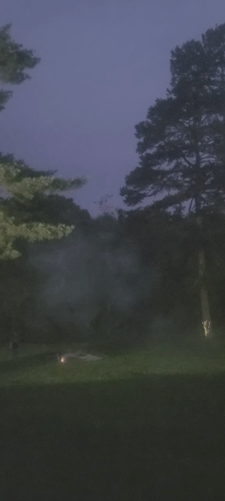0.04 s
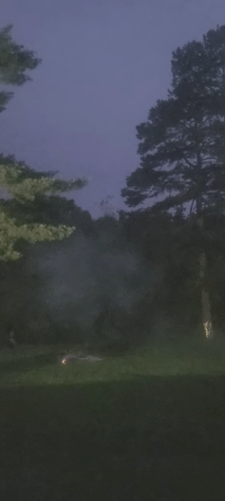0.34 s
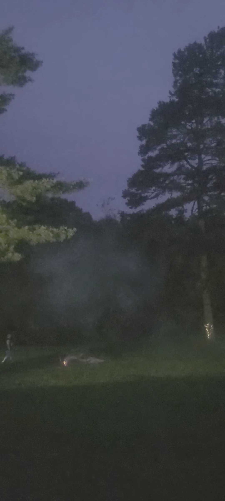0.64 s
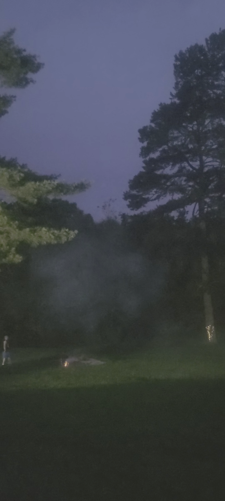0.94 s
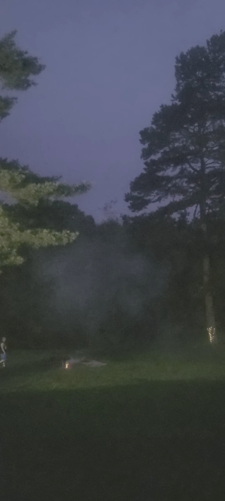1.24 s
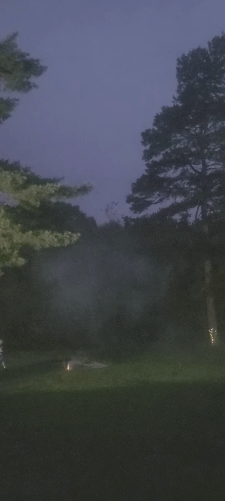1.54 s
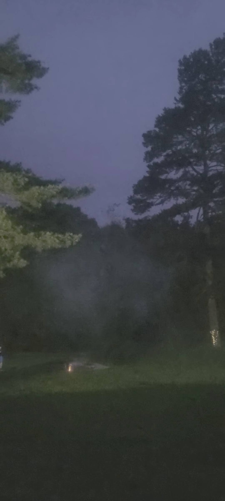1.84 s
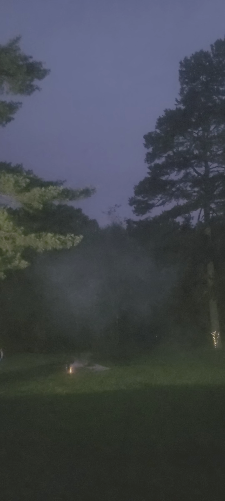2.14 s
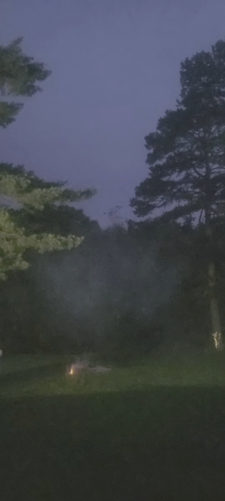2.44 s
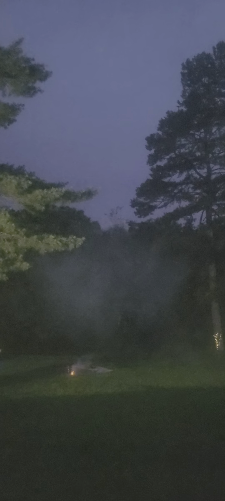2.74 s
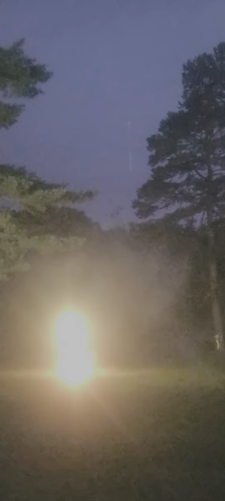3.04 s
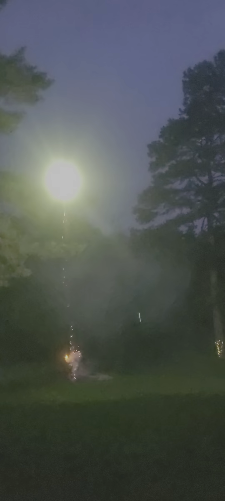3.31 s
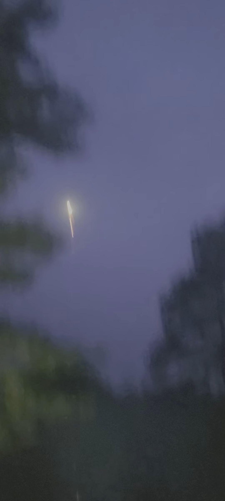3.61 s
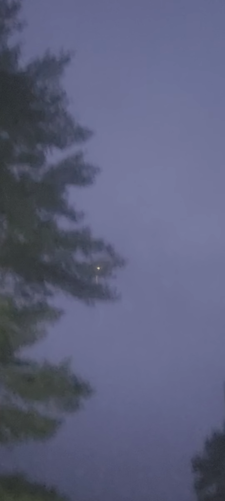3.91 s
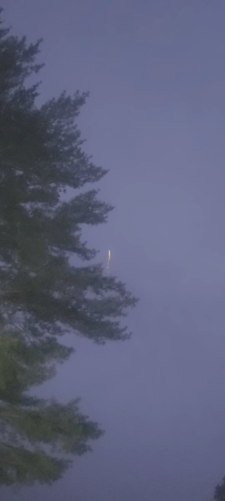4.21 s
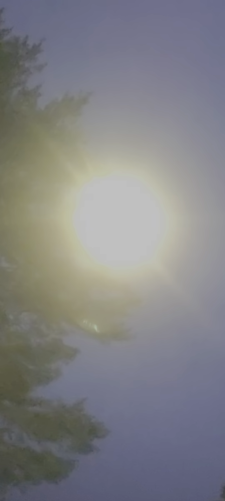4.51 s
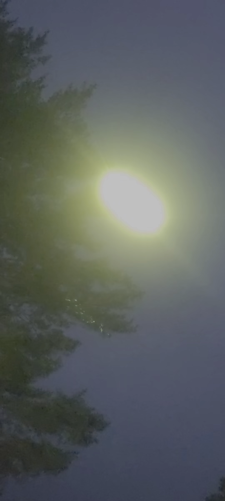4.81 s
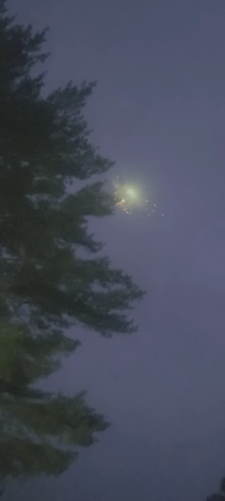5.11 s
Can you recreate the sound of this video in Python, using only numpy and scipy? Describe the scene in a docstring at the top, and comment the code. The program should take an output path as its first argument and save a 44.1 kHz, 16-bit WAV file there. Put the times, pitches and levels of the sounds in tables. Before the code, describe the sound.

A quiet garden at dusk: crickets trill steadily throughout, a katydid rasps in short phrases of three or four strokes, and a distant machine hums faintly over a low outdoor rumble. A few soft, brief rustles occur close to the microphone. At about 3.2 seconds a firework goes off on the lawn with a single sharp bang, by far the loudest sound. Its crack and short boom bounce off nearby surfaces and scatter through the trees as a hissing tail that fades over about a second. At around 4.6 seconds comes a smaller dry pop, then near 4.8 seconds a quick cluster of crackling pops and knocks with a low thump and a light echo. A faint, grainy fizz of sparks dies away, and one last tiny pop sounds at about 5.2 seconds as the insects continue.

```python
"""A firework bangs once on a lawn at dusk: a shock front and its boom, reflected by the ground and nearby
walls and scattered by the tree line. Small dry pops and knocks with a low thump follow; sparks fizz out.
All along, crickets trill as wing strokes pulse their resonances, a katydid rasps its file in short
phrases, a distant machine hums and something rustles softly near the microphone."""
import sys
import numpy as np
from scipy import signal
from scipy.fft import rfft, irfft, next_fast_len
from scipy.io import wavfile
from scipy.ndimage import map_coordinates

SR = 44100
rng = np.random.default_rng(int(sys.argv[2]) if len(sys.argv) > 2 else 0)


def master(y):
    """Save y as 16-bit WAV."""
    cut = np.clip(np.atleast_2d(y).T, -1, 1)
    pcm = np.round(cut * 32767)  # scale
    wavfile.write(sys.argv[1], SR, pcm.astype(np.int16))


N = 231745
TIME = np.arange(N) / SR


def amp(db):
    """Decibels to amplitude ratio."""
    return 10 ** (np.asarray(db) / 20)


def unit(x):
    """Normalisation to rms 1."""
    return x / np.sqrt(np.mean(x ** 2) + 1e-20)


def along(points, hz):
    """Interpolation of (Hz, value) points on a logarithmic frequency axis."""
    knots, values = np.transpose(points)
    return np.interp(np.log(hz + 1), np.log(knots + 1), values)


def pan(db):
    """Level difference: two gains, the left db above the right."""
    return amp(np.array([[.5], [-.5]]) * db)


def wobble(rate):
    """Random modulation: a smooth curve with rate knots a second."""
    return map_coordinates(rng.standard_normal(int(N * rate / SR) + 4), [TIME * rate])


def dying(s, t60):
    """Exponential decay from time s, losing 60 dB in t60 seconds."""
    return amp(-60 * np.maximum(TIME - s, 0) / t60) * (TIME > s)


def ring(s, hz, t60):
    """Damped oscillation from time s."""
    return np.sin(2 * np.pi * hz * (TIME - s)) * dying(s, t60)


def filtered(x, response):
    """Linear filtering: the spectrum of x times a frequency response."""
    size = next_fast_len(N + SR // 2)
    return irfft(rfft(x, size) * response(np.fft.rfftfreq(size, 1 / SR)), size)[..., :N]


def later(x, s):
    """A delay of s seconds as a linear phase shift."""
    return filtered(x, lambda hz: np.exp(-2j * np.pi * hz * s))


def narrow(centre, width):
    """Resonance driven by stereo noise; its amplitude halves width Hz from the centre."""
    noise = rng.standard_normal((2, N))
    return unit(filtered(noise, lambda hz: 1 / (1 + ((hz - centre) / width) ** 2)))


def struck(x, colour, size=4096):
    """Minimum-phase filtering: the colour rings only after each pulse."""
    gain = amp(along(colour, np.fft.rfftfreq(size, 1 / SR)))
    cepstrum = irfft(np.log(gain))
    cepstrum[1:size // 2] *= 2
    cepstrum[size // 2 + 1:] = 0
    impulse_response = irfft(np.exp(rfft(cepstrum)))
    return signal.fftconvolve(x, impulse_response[None], axes=1)[:, :N]


# Likeness of left and right. Each row: frequency in Hz, correlation.
COHERENCE = [(60, 0.98), (180, 0.93), (550, 0.81), (1650, 0.38), (4970, 0.0081), (15000, 0.07)]
def diffuse(colour, grain_db=0):
    """A diffuse field of rms 1: noise from all around, coherent in the bass, unrelated in the treble."""
    white = rng.standard_normal((2, N)) * amp(grain_db * wobble(900))
    angle = lambda hz: np.arccos(np.clip(along(COHERENCE, hz), -1, 1)) / 2
    mid, side = filtered(white, lambda hz: amp(along(colour, hz)) * [np.cos(angle(hz)), np.sin(angle(hz))])
    return unit(np.array([mid + side, mid - side]))


# Spectra of the outdoor rumble and of far insects. Each row: frequency in Hz, relative level in dB.
AIR_SPECTRUM = [(15, -42.5), (25, -43), (37, -13.5), (59, 3), (124, -8.5), (145, -14.5), (267, -21),
                (299, -14.5), (384, -18.5), (414, -11.5), (447, -20.5), (763, -17.5), (1040, -21.5),
                (2400, -23.5), (3120, -59), (5280, -120)]
HAZE_SPECTRUM = [(1800, -24), (2500, -15), (3200, 12), (3900, -22), (4400, -4), (4800, 5.5), (5900, 6.5),
                 (6700, -6.5), (7800, -15.5), (8800, -36.5), (12000, -24.5), (15000, -17.5)]
# The distant machine's hum. Each row: frequency in Hz, relative level in dB.
HUM_PARTIALS = [(59.5, -66.5), (120, -66.5), (301, -71), (360, -75), (420, -78.5), (478, -76)]
# Its fan's resonances. Each row: centre in Hz, half-width in Hz, relative level in dB.
FAN_RESONANCES = [(773, 30, -71), (1308, 67, -74), (1714, 55, -75.5), (1964, 40, -74.5)]
# The background's balance. Each row: frequency in Hz, left over right in dB.
BACKGROUND_BALANCE = [(60, 10), (110, 12), (200, 10.5), (380, 9.5), (700, 7), (1290, 4), (2380, -3.5),
                      (4400, 4.5), (8120, 14.5), (15000, 8)]
def evening(left_lead_s=.00009):
    """Superposition of outdoor rumble, a machine and far insects, reaching the left microphone first."""
    air = amp(-57 + .89 * wobble(2.67)) * diffuse(AIR_SPECTRUM)
    wavering = lambda hz: amp(1.8 * wobble(5)) * np.sin(2 * np.pi * hz * TIME + .8 * wobble(6))
    hum = sum(amp(db) * wavering(hz) for hz, db in HUM_PARTIALS)
    fan = sum(amp(db) * narrow(centre, width) for centre, width, db in FAN_RESONANCES)
    haze = amp(-67.5 + .3 * wobble(5.3)) * diffuse(HAZE_SPECTRUM)
    left, right = filtered(air + hum + fan + haze, lambda hz: pan(along(BACKGROUND_BALANCE, hz)))
    return np.array([left, later(right, left_lead_s)])


# Cricket trills. Each row: centre in Hz, half-width in Hz, level in dB, pulses per second,
# pulse depth from 0 to 1, left over right in dB.
CRICKET_TRILLS = [(2905, 89, -62.5, 63, 0.28, 5), (2747, 114, -63, 55, 0, 0), (3608, 82, -77.5, 11, 0, 17),
                  (4120, 170, -84, 49, 0.5, 15.5), (6096, 147, -67.5, 85, 0.25, 1.5)]
def crickets():
    """Amplitude modulation: wing strokes pulse each resonance; many singers and echoes blur the pitch."""
    out = np.zeros((2, N))
    for centre, width, db, rate, depth, left_db in CRICKET_TRILLS:
        cycles = np.cumsum(rate * (1 + .004 * wobble(3))) / SR
        strokes = 1 + depth * np.cos(2 * np.pi * cycles)
        swell = amp(.6 * wobble(4))
        out += amp(db) * swell * unit(narrow(centre, width) * strokes) * pan(left_db)
    return out


# Faint insect notes. Each row: centre in Hz, half-width in Hz, level in dB, chirps per second.
HIGH_CHIRPS = [(9840, 81, -102.5, 5.6), (9440, 50, -105, 2.7)]
def chirpers():
    """Gated resonances: thin, very high insect notes come and go."""
    gate = lambda rate: np.maximum(np.sin(2 * np.pi * rate * TIME + .5 * wobble(2.1)), 0)
    notes = sum(amp(db) * unit(narrow(hz, width) * gate(rate)) for hz, width, db, rate in HIGH_CHIRPS)
    return notes * pan(db=9)


# Katydid phrases. Each row: start in seconds, number of rasps, level in dB.
KATYDID_PHRASES = [(.02, 3, -74), (0.449, 4, -64), (1.01, 3, -62.5), (2.19, 4, -64), (2.89, 3, -66.5),
                   (3.95, 3, -60), (4.688, 3, -59.5)]
# Spectrum of a rasp. Each row: frequency in Hz, relative level in dB.
RASP_SPECTRUM = [(2600, -25), (3250, 5.5), (3950, -28), (4300, -2.5), (4600, 3.5), (4950, 2.5), (5400, 3),
                 (6200, -6.5), (7500, -46), (10000, -37), (15000, -38)]
def katydid(spacing_s=.079, sigma_s=.018):
    """Stridulation: each quick run of file teeth is heard as a short swell of dry noise."""
    rasps = [(s + k * spacing_s, db) for s, count, db in KATYDID_PHRASES for k in range(count)]
    envelope = sum(amp(db) * np.exp(-.5 * ((TIME - s) / sigma_s) ** 2) for s, db in rasps)
    return diffuse(RASP_SPECTRUM) * envelope * pan(db=10.5)


# Rustles. Each row: peak time in seconds, level in dB, Gaussian width in seconds, relative body in dB.
RUSTLE_STROKES = [(.19, -75, .015, -8), (1.044, -66, .025, 3.5), (2.214, -64, .0105, 10),
                  (2.677, -70.5, .018, 4), (3.589, -57, .0095, -6), (4.455, -56.5, 0.012, -15),
                  (5.06, -69, .015, 1), (5.226, -59.5, 0.0093, 1.5)]
# Spectrum of rustle and spark fizz. Each row: frequency in Hz, relative level in dB.
BRUSH_SPECTRUM = [(1500, 0), (3500, -3.5), (6500, 3), (8000, -10.5), (10000, -18.5), (15000, -30)]
def rustles():
    """Noise under Gaussian envelopes: soft brushes close by, some with a duller body."""
    brush = diffuse(BRUSH_SPECTRUM)
    body_spectrum = [(60, -17), (200, 3), (450, 5.5), (1000, -13), (2300, -6), (4000, -24), (9000, -52)]
    body = diffuse(body_spectrum, grain_db=4)
    strokes = sum(amp(db) * np.exp(-.5 * ((TIME - s) / sigma) ** 2) * (brush + amp(body_db) * body)
                  for s, db, sigma, body_db in RUSTLE_STROKES)
    return strokes * pan(db=11.5)


def burst(s, click_db, scatter_db, life_s, cutoff_hz=16000, size=4410):
    """Scattering: a pulse at time s trails a dying spray of tiny ones that differs from side to side."""
    t = np.arange(size) / SR
    spray = (1.3 * rng.standard_normal(size) + rng.standard_normal((2, size))) * np.exp(-t / life_s)
    spray *= amp(scatter_db) / np.linalg.norm(spray, axis=1, keepdims=True)
    spray = signal.lfilter(*signal.butter(1, 300, "high", fs=SR), spray)  # long waves hardly scatter
    spray[:, 0] += amp(click_db)
    out = np.zeros((2, N + SR))
    out[:, round(s * SR):][:, :size] = signal.lfilter(*signal.butter(2, cutoff_hz, fs=SR), spray)
    return out[:, :N]


BANG_S = 3.1722
# Spectra of the shock front and of its scattered sound. Each row: frequency in Hz, gain in dB.
SHOCK_SPECTRUM = [(25, -27), (70, -10), (150, -10), (260, -2), (350, 0), (470, -31), (900, -32),
                  (1400, -17), (2300, -25), (3200, -12), (4100, -24.5), (6200, -25), (9500, -42),
                  (15000, -50)]
SCATTER_SPECTRUM = [(30, -34), (90, 6), (280, 0), (450, -2.5), (720, -2.5), (1000, -3.5), (1500, -3),
                    (2300, -5.5), (3100, -2), (4100, -13), (6000, -7.5), (8000, -19), (10000, -26),
                    (12000, -30), (14000, -23.5), (16000, -25)]
# The bright, brief ring of the bang's crack. Each row: frequency in Hz, level in dB, T60 in seconds.
SNAP_MODES = [(3280, -5.5, 0.0043), (5730, -13, 0.0032), (1260, -19, 0.0041)]
# Distinct echoes. Each row: arrival in seconds, then relative levels of front, spray and boom in dB.
REFLECTIONS = [(3.1854, 12, -8, -25), (3.1886, 16, 2, -26), (3.1940, 11, -15, -14.5), (3.2060, 8, -8, -25),
               (3.2141, 12, -5, -30), (3.2690, 4, -6, -31), (3.2869, 5, 4.5, -26.5),
               (3.4607, -10, -11, -41), (3.4904, 0, -3.5, -41)]
def bang(boom_t60=.018, smear_s=.0035, cutoff_halving_s=.052):
    """Reflection: a shock and its boom arrive directly, then smeared and deepened off nearby surfaces."""
    front = burst(BANG_S, click_db=25, scatter_db=13, life_s=.0013)
    boom = amp(-19.5) * ring(BANG_S - .0005, hz=250, t60=boom_t60)
    snap = sum(amp(db) * ring(BANG_S, hz, t60) for hz, db, t60 in SNAP_MODES)
    fronts, sprays, booms = np.zeros((3, 2, N))
    for s, front_db, scatter_db, boom_db in REFLECTIONS:
        cutoff_hz = 19000 / (1 + (s - BANG_S) / cutoff_halving_s)  # air absorption dulls longer paths
        fronts += burst(s, front_db, -np.inf, smear_s, cutoff_hz)
        sprays += burst(s, -np.inf, scatter_db, smear_s, cutoff_hz)
        booms += amp(boom_db) * ring(s, hz=230, t60=boom_t60)
    rumble = amp(-26) * ring(REFLECTIONS[0][0], hz=108, t60=.064)  # starts with the first echo
    echoes = struck(fronts, SHOCK_SPECTRUM) + struck(sprays, SCATTER_SPECTRUM) + booms + rumble
    left, right = struck(front, SHOCK_SPECTRUM) + snap + boom + echoes * pan(db=6.5)
    return np.array([left, np.roll(right, -3)])  # reaches the right microphone three samples early


# The garden's reverberation time. Each row: frequency in Hz, T60 in seconds.
GARDEN_T60 = [(100, 0.3), (300, 1.5), (500, 1.78), (720, 2.14), (1100, 1.34), (3000, 1.14), (6000, 0.91),
              (12000, 0.62)]
def woods(s, noise, tree_delay_s=.072, tree_rise_s=.004, shrub_fall_db_per_s=95):
    """Reverberation of a report at time s: shrubs answer first, then trees; the midrange lingers."""
    hz, t, spectra = signal.stft(noise, SR, nperseg=256)
    fade = amp(-60 * np.maximum(t - s, 0) / along(GARDEN_T60, hz)[:, None])
    tail = signal.istft(spectra * fade, SR, nperseg=256)[1][:, :N]
    age = np.maximum(TIME - s, 0)
    shrubs = amp(.5 - shrub_fall_db_per_s * age)
    trees = .5 + .5 * np.tanh((age - tree_delay_s) / tree_rise_s)
    return tail * np.hypot(shrubs, trees) * (TIME > s)


def tree_echo():
    """Diffuse scattering: trunks and branches turn the bang into a hiss; clumps answer in lumps."""
    lumps = amp(.6 * wobble(110))
    return amp(-27.5) * lumps * woods(BANG_S, diffuse(SCATTER_SPECTRUM, grain_db=1.5)) * pan(db=7.5)


# Dry pops and knocks. Each row: start in seconds, click in dB, crackle in dB, crackle cutoff in Hz,
# thump in dB, thump frequency in Hz, tree echo in dB; levels are relative.
DRY_POPS = [(4.5608, 11, 1, 7000, -34, 290, -44), (4.5682, 5, -12, 2400, -33, 280, -52),
            (4.7610, -1, 8.5, 11000, -27, 95, -50), (4.7888, -1, 9.5, 3800, -21, 140, -52),
            (4.8167, -1, -2, 1700, -44, 300, -62), (5.2205, -17, -14, 5000, -44, 80, -66)]
# Spectra of a pop, its sizzle and its tree echo. Each row: frequency in Hz, gain in dB.
POP_SPECTRUM = [(40, -39), (150, 2), (330, -3), (560, -4.5), (900, -13.5), (1300, -7.5), (1900, -6),
                (2400, -13.5), (2900, -9.5), (3900, -28), (5500, -17), (7500, -18.5), (10000, -27.5),
                (15000, -39)]
SIZZLE_SPECTRUM = [(80, -10), (170, 5), (320, 11), (480, 3), (900, 6), (1700, -3), (2900, 5.5), (4000, -9),
                   (6500, -7.5), (10000, -24), (15000, -30)]
POP_ECHO_SPECTRUM = [(60, -10), (200, 10), (600, -0.5), (1000, -2.5), (1800, 5.5), (2800, -1), (4000, -7),
                     (6500, -5.5), (10000, -27), (15000, -25)]
# The hollow ring after the last big pop. Each row: frequency in Hz, level in dB, T60 in seconds.
HOLLOW_MODES = [(1046, -37.5, 0.15), (1370, -44, 0.2), (1630, -38, 0.13)]
def pops(crackle_lag_s=.0028, thump_cycles=3.6, wall_delay_s=.017, wall_cutoff_hz=700, hollow_s=4.8):
    """Impulses and their reflections: a click, sizzling crackle and thump, echoed by a wall and trees."""
    sharp, low, sizzle, wash = np.zeros((4, 2, N))
    for s, click_db, crackle_db, cutoff_hz, thump_db, thump_hz, echo_db in DRY_POPS:
        crackle_s = s + crackle_lag_s
        sharp += pan(db=7.5) * burst(s, click_db, click_db - 6, life_s=.00069, cutoff_hz=2760)
        sharp += burst(crackle_s, -np.inf, crackle_db, life_s=.0024, cutoff_hz=cutoff_hz)
        low += amp(thump_db) * ring(s, thump_hz, t60=thump_cycles / thump_hz)
        low += amp(crackle_db - 33.5) * ring(crackle_s, hz=283, t60=.021)  # short thud under the crackle
        sizzle = np.hypot(sizzle, amp(crackle_db - 42) * dying(crackle_s, t60=.13))  # powers add
        wash += amp(echo_db) * woods(s, rng.standard_normal((2, N)))
    direct = struck(sharp, POP_SPECTRUM) + low * pan(db=10)
    wall = amp(-9.5) * filtered(later(direct, wall_delay_s), lambda hz: 1 / (1 + 1j * hz / wall_cutoff_hz))
    trees = filtered(wash, lambda hz: amp(along(POP_ECHO_SPECTRUM, hz)))
    hollow = sum(amp(db) * dying(hollow_s, t60) * narrow(hz, width=40) for hz, db, t60 in HOLLOW_MODES)
    return direct + sizzle * diffuse(SIZZLE_SPECTRUM) + hollow + pan(db=7) * (wall + trees)


def sparks(start_s=4.765):
    """Exponential decay: a faint, grainy fizz fades as the sparks burn out."""
    return amp(-63.5) * dying(start_s, t60=1.7) * diffuse(BRUSH_SPECTRUM, grain_db=2.5) * pan(db=11)


def scene():
    """Superposition: the firework and the pops add to the sounds of the evening garden."""
    events = bang() + tree_echo() + pops() + sparks()
    return events + rustles() + crickets() + chirpers() + katydid() + evening()


def record(dry, ceiling=.98, low_hz=46, top_hz=15850):
    """Soft saturation rounds off the highest peak; a band-pass removes the extreme bass and treble."""
    limited = dry / (1 + np.abs(dry / ceiling) ** 6) ** (1 / 6)
    low_pass = lambda hz: .5 - .5 * np.tanh((hz - top_hz) / 120)
    high_pass = lambda hz: 1 / np.sqrt(1 + (low_hz / (hz + 1)) ** 6)
    return filtered(limited, lambda hz: low_pass(hz) * high_pass(hz))


dry = scene()
out = record(dry)
master(out)
```